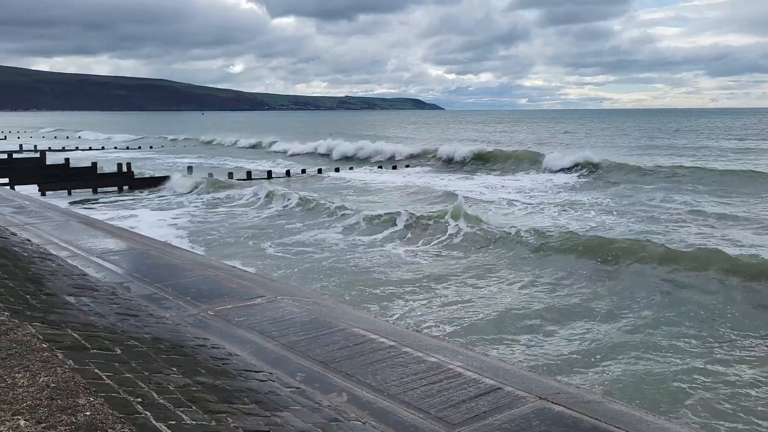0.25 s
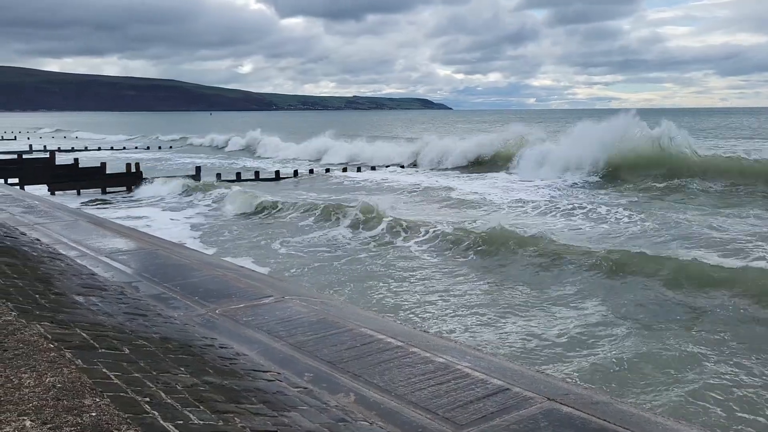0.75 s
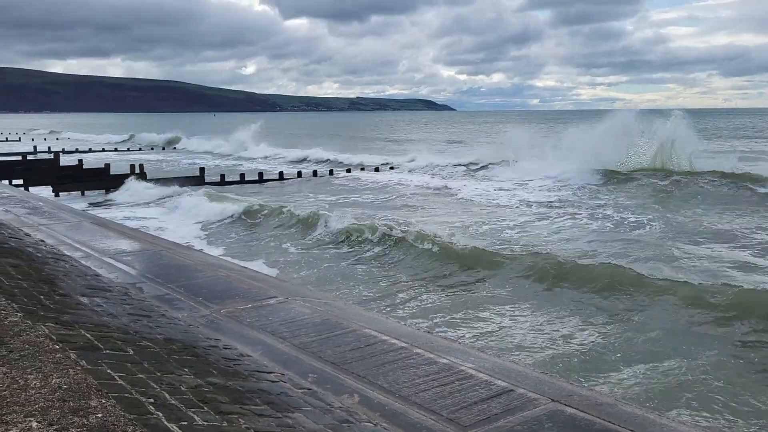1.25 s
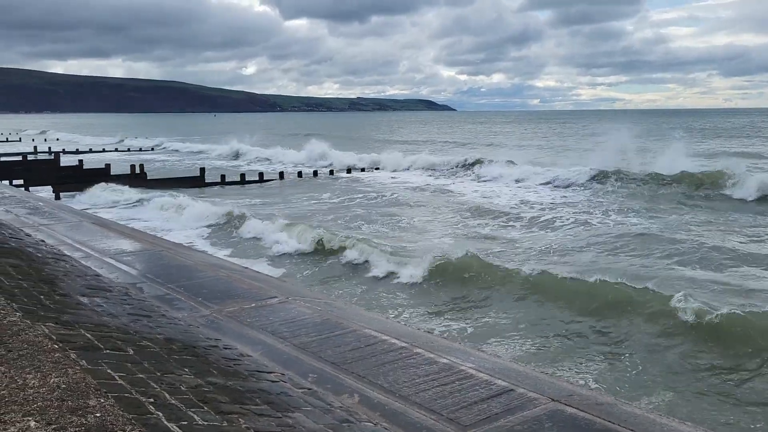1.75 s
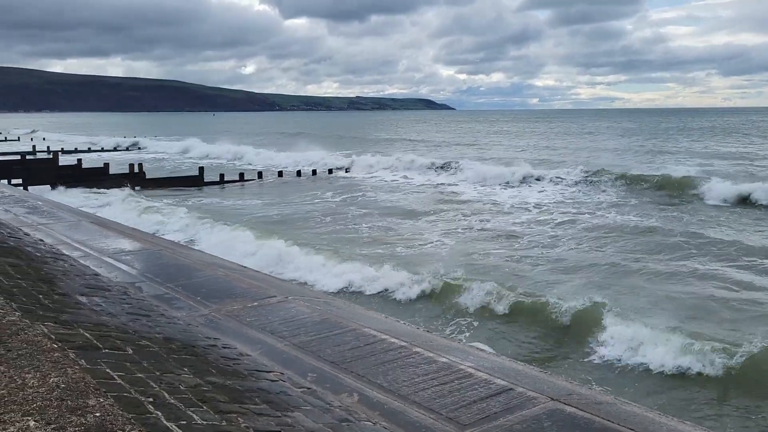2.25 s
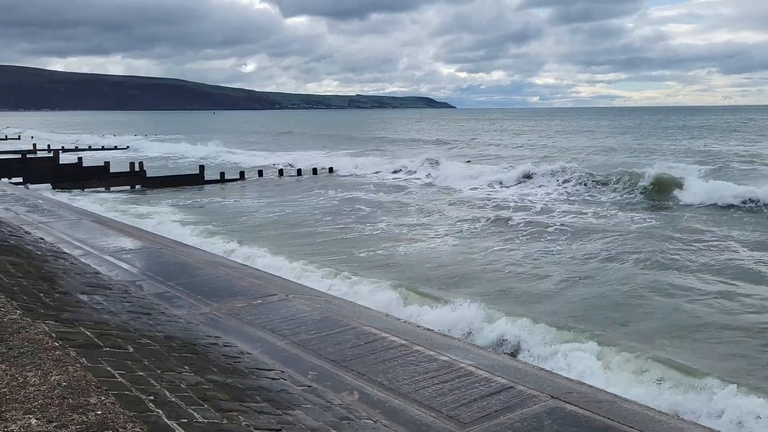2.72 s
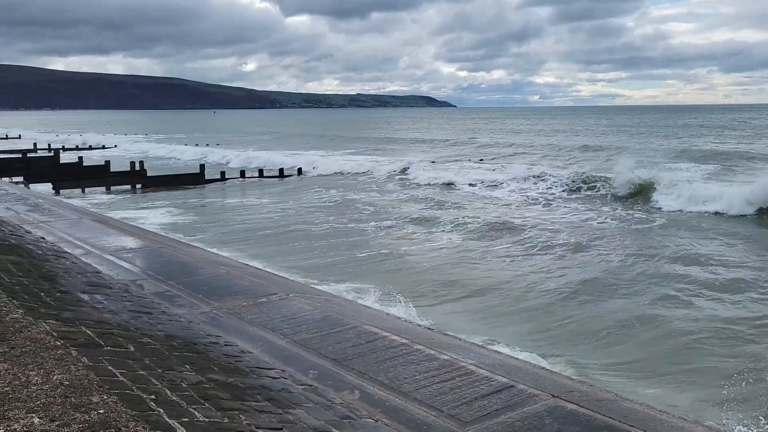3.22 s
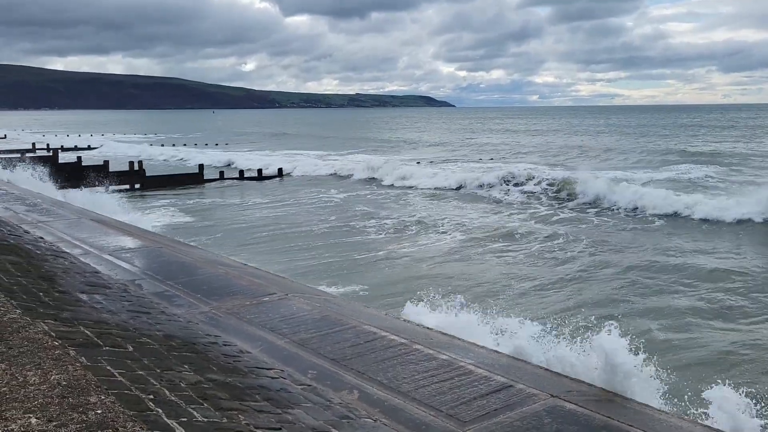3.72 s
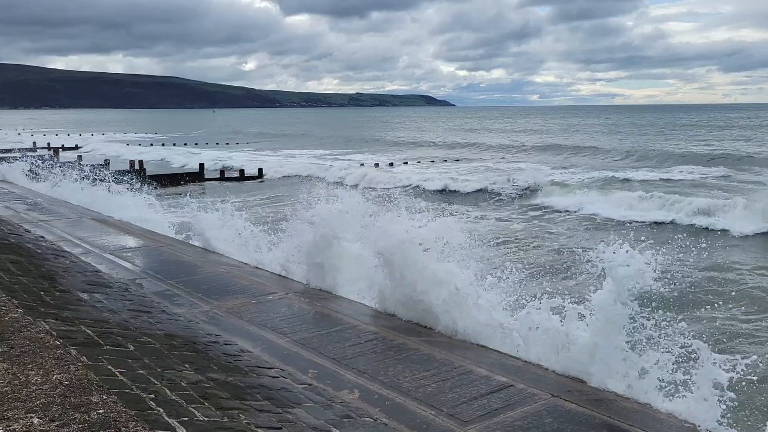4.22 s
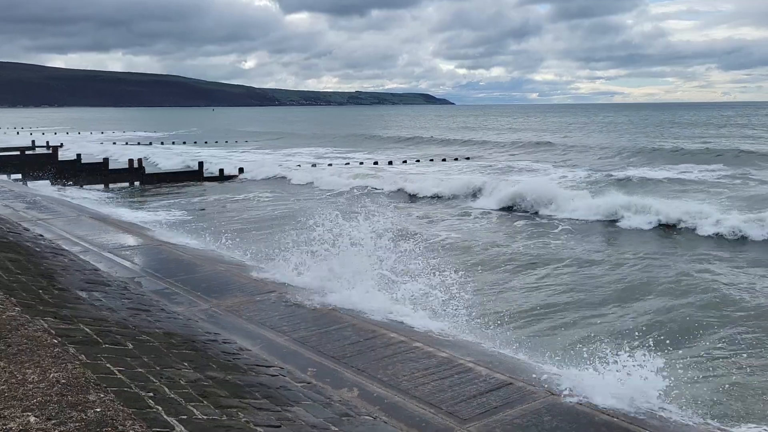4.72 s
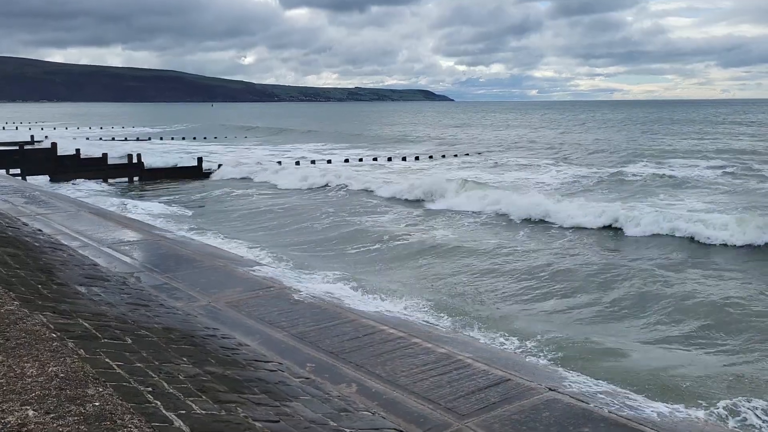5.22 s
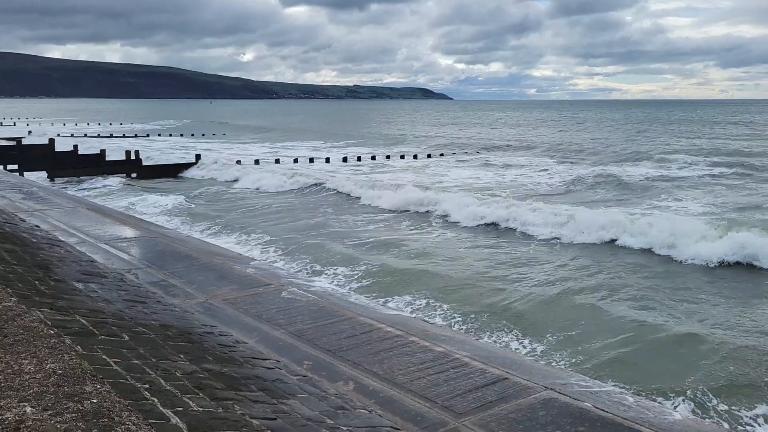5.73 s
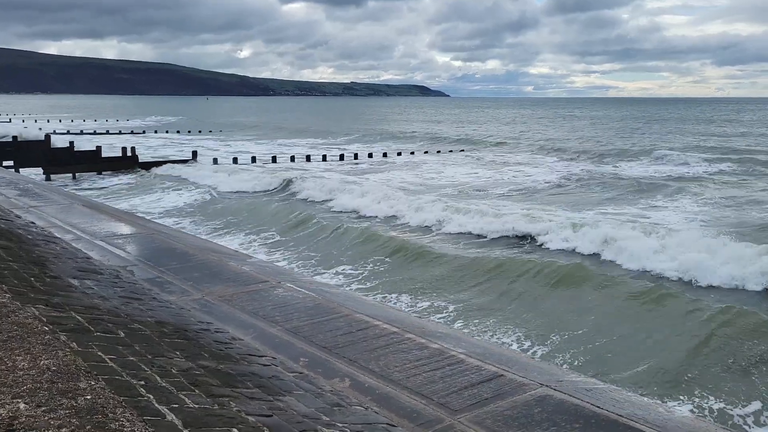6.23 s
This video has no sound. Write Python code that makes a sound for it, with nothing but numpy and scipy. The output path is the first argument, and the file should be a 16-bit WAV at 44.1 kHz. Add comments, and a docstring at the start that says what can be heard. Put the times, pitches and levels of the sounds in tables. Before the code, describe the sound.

Gusty wind thumps and rumbles on the microphone while sea waves break along a concrete sea wall, splash up spray and drain back as foam.

```python
"""Wind knocks at a hand-held recorder on the seafront over a breaker far out; then waves break close by.
They run along a sloping concrete sea wall, throw up spray and drain back as foam: shaped noise and ringing drops.
The left port is covered and faces the wind: it hears the sea dully and takes the hardest buffets.
The open right port hears the bright wash. Wind is low noise swelling with gusts and eddies, plus sharp pulses."""
import sys
import numpy as np
from scipy import signal
from scipy.fft import rfft, irfft, next_fast_len
from scipy.io import wavfile
from scipy.ndimage import uniform_filter1d, minimum_filter1d

SR = 44100
rng = np.random.default_rng(int(sys.argv[2]) if len(sys.argv) > 2 else 0)


def unload_audio(sound):
    """Save the sound as a 16-bit wav file, at the path given as the first command line argument."""
    columns = np.transpose(np.atleast_2d(sound))
    # keep every value between -1 and 1, then stretch to whole-number steps
    steps = np.round(np.clip(columns, -1, 1) * 32767)
    wavfile.write(sys.argv[1], SR, steps.astype(np.int16))


N = 285327
TIME = np.arange(N) / SR
FFT_SIZE = next_fast_len(N + 4096)
FREQS = np.maximum(np.arange(FFT_SIZE // 2 + 1) * SR / FFT_SIZE, 1)

# Spectral shapes of the water, air pockets up to foam: (frequency [Hz], density [dB per Hz])
ROAR_SPECTRUM = [(30, -33), (70, 1.5), (200, -4), (320, 1.5), (460, 0), (670, 2), (820, -2), (1000, -16.5),
                 (1500, -11), (3000, -24)]
WASH_SPECTRUM = [(250, -22), (600, -5), (1000, -.5), (1300, 1.5), (2000, -1), (3000, -2.4), (4500, -3.1),
                 (6500, -4.9), (7800, -2.1), (8700, -7.3), (10000, -22), (13000, -50)]
FIZZ_SPECTRUM = [(4000, -36), (7500, -24), (9200, -0.5), (10500, -2.5), (11600, -11.5), (12700, -0.5),
                 (14000, -2), (15700, -4)]
# Spectral shapes of wind on a port, dull to sharp: (frequency [Hz], density [dB per Hz])
THUD_SPECTRUM = [(15, -37), (32, -15), (55, 1.5), (120, -2.5), (200, -10), (300, -16.5), (450, -30.5),
                 (800, -41), (2000, -67)]
RASP_SPECTRUM = [(120, -7.5), (300, 4), (450, 4.5), (680, -1), (1000, -11.5), (1400, -20), (2200, -40),
                 (4000, -71), (8000, -82)]
CRACKLE_SPECTRUM = [(600, -20), (1300, 0), (2000, -7), (3000, -16), (4500, -31), (7000, -58)]
# Response of the covered left port to the sea: (frequency [Hz], gain [dB])
COVERED_PORT_RESPONSE = [(60, 18), (250, 7.5), (450, 2.5), (650, 3.5), (900, -0.5), (1300, -1),
                         (2000, -4.5), (3000, -8.5), (4500, -17), (6500, -25.5), (8300, -43), (10300, -27),
                         (11600, -16.5), (15500, -24)]
# Likeness of the sea at the two ports: (frequency [Hz], likeness [0-1])
PORT_LIKENESS = [(100, 0.9), (350, .75), (700, 0.6), (1400, .33), (4000, 0), (13000, 0)]
PORT_LAG_S = 0.00036   # the waves arrive from the right
CUTOFF_HZ = 15800

# The open sea behind everything, before layer trims: (roar [dB], wash [dB], fizz [dB])
OPEN_SEA_LEVELS = (-57.5, -52.5, -75)
# Surges of water, before layer trims: a breaker far out, a nearer crest that spills, breaks along
# the wall and runs back; the next meets the wall, its spray shoots up, comes down and lands;
# foam drains, and the backwash meets a new wave, which rolls in:
# (crest time [s], rise to crest from half power [s], fall to half power [s], roar [dB], wash [dB], fizz [dB])
WAVE_SURGES = [(0.24, .2, .4, -50, -49.5, -77), (1.42, .28, .5, -71.5, -56, -63),
               (2.45, .28, .19, -39.5, -32.5, -41), (2.95, .25, .5, -43, -39.5, -51),
               (3.53, .08, 0.2, -39.5, -41.5, -50.5), (3.94, .16, .15, -40.5, -36, -48.5),
               (4.4, .18, .2, -37, -33, -43), (4.82, .08, .14, -53, -39, -48),
               (5.3, .4, .45, -43, -41.5, -52), (5.81, .09, .13, -39, -35, -41.5),
               (6.33, .3, .3, -34.5, -32, -40.5)]
# Brief dips in the level of the sea: (start [s], depth [dB], hold [s], recovery [s])
SEA_DIPS = [(0.5, 8, .3, .35), (4.509, 6.5, .02, .05)]
DIP_ATTACK_S = 0.025

# The breeze between gusts, before port trims: (left [dB], right [dB])
BREEZE_LEVELS = (-41, -51.5)
# Gusts, before port trims: (peak time [s], length at half power [s], left [dB], right [dB])
WIND_GUSTS = [(0.3, 0.21, -37, -37.5), (0.526, 0.24, -21, -42), (0.845, 0.2, -52, -51.5),
              (1.444, 0.12, -26.5, -64), (2.296, 0.43, -24.5, -41.5), (2.573, 0.23, -19.5, -44),
              (3, 0.31, -23.5, -40.5), (3.41, 0.15, -32, -28), (3.913, 1, -28, -45), (4.5, 0.095, -14, -52),
              (5.01, 0.25, -26, -45), (6.3, .9, -26, -41.5)]
# Hard gusts shed eddies on the left port at an even pace, before port trims:
# (first time [s], spacing [s], count, first level [dB], last level [dB],
#  length at half power [s], rasp relative to level [dB])
EDDY_FLURRIES = [(0.416, .058, 3, -5, 0.5, 0.019, -11.5), (0.596, .055, 3, -7.5, -7.5, 0.02, -11),
                 (2.404, .111, 3, -11, -4.5, 0.021, -26.5), (4.412, .041, 4, -7, -3, 0.013, -22.5),
                 (6.142, 0.058, 4, -17.5, -14, 0.02, -49)]
# Lone eddies, before port trims:
# (time [s], port, level [dB], length at half power [s], rasp relative to level [dB])
LONE_BUFFETS = [(0.218, "right", -21.5, 0.006, -5.5), (0.344, "right", -36, 0.019, -3),
                (0.373, "left", -15, 0.028, -35), (0.492, "left", -3, 0.021, -7.5),
                (0.772, "left", -18.5, 0.021, -17), (0.875, "left", -22, 0.018, -38),
                (1.109, "right", -33.5, 0.02, -6), (1.339, "left", -19, 0.022, -19),
                (1.519, "left", -19, 0.0091, -24.5), (2.145, "left", -5, 0.017, -22),
                (2.232, "right", -26.5, 0.036, -9.5), (2.26, "left", -10, 0.011, -36),
                (2.928, "left", -11, 0.014, -46), (2.996, "left", -11.5, .042, -19),
                (3.027, "left", -9, 0.012, -15.5), (3.384, "right", -25.5, .016, 3.5),
                (3.446, "left", -16.5, 0.014, -37), (3.58, "left", -19, .03, -34),
                (4.129, "left", -14, .027, -31), (4.168, "right", -24.5, 0.032, -11.5),
                (4.431, "left", -2, 0.017, -11.5), (4.621, "left", -11, 0.013, -44),
                (4.844, "left", -11, 0.034, -26), (4.855, "right", -39, 0.013, 8.5),
                (5.068, "left", -15.5, 0.013, -27), (5.811, "left", -20.5, .05, -9.5),
                (6.374, "left", -4, 0.015, -16), (6.401, "left", -7, .035, -34),
                (6.463, "left", -8, 0.031, -15.5)]
# Small eddies come at random; their level is relative to the wind that carries them
EDDIES_PER_S, EDDY_DB, EDDY_SPREAD_DB, EDDY_LENGTH_S, EDDY_RASP_DB = 4.3, 7, 3, 0.011, -23.5
# An eddy knocks as it arrives, the harder the raspier it is (dB of knock per dB of rasp)
KNOCK_LEAD_S, KNOCK_FOLLOWS_RASP = 0.00303, 0.71
# Eddies in a flurry heave as they leave; level relative to the eddy
HEAVE_DB, HEAVE_LAG_S, HEAVE_LENGTH_S, HEAVE_HZ = -3.5, 0.0087, 0.03, 56.7


def from_db(db):
    """Decibels to gain."""
    return 10 ** (np.asarray(db) / 20)


def rms_one(x):
    """Scale to unit power."""
    return x / np.sqrt(np.mean(x ** 2) + 1e-20)


def at_hz(points):
    """A table read along a log-frequency axis."""
    hz, value = np.transpose(points)
    return np.interp(np.log(FREQS), np.log(hz), value)


def filtered(x, response):
    """Pass a sound through a frequency response."""
    return irfft(rfft(x, FFT_SIZE) * response, FFT_SIZE)[..., :N]


def noise(spectrum):
    """Coloured noise of unit power."""
    white = rng.standard_normal(N)
    return rms_one(filtered(white, from_db(at_hz(spectrum))))


def drift(rate_hz):
    """Slow chance of spread 1: noise through a two-pole low-pass, drawn every 40 samples."""
    pole = np.exp(-2 * np.pi * rate_hz * 40 / SR)
    white = rng.standard_normal(N // 40 + 2002)
    slow = signal.lfilter([1], [1, -2 * pole, pole ** 2], white)[2000:]   # skip the filter's start
    return np.interp(np.arange(N) / 40, np.arange(len(slow)), rms_one(slow))


def swell(s, rise_s, fall_s):
    """Power that builds to 1 at a moment and dies away; it is halved one rise before and one fall after."""
    width = np.maximum(np.where(TIME < s, rise_s, fall_s), 0.002)
    return 1 / 2 ** np.minimum(((TIME - s) / width) ** 2, 60)


def surf_levels():
    """Roar, wash and fizz in dB: the surges add power to the open sea, less the dips."""
    power = from_db(OPEN_SEA_LEVELS)[:, None] ** 2
    for s, rise_s, fall_s, *levels_db in WAVE_SURGES:
        power = power + from_db(levels_db)[:, None] ** 2 * swell(s, rise_s, fall_s)
    dip_db = 0
    for s, depth_db, hold_s, recovery_s in SEA_DIPS:
        corners = s + np.cumsum([0, DIP_ATTACK_S, hold_s, recovery_s])
        dip_db = dip_db + np.interp(TIME, corners, [0, depth_db, depth_db, 0])
    return 10 * np.log10(power) - dip_db


def churn(spectrum, surge_db, patch_db, rate_hz, count=5):
    """Churning water: the whole surges together, and each pitch region swells on its own."""
    gain = from_db(at_hz(spectrum))
    white = rfft(rng.standard_normal((2, FFT_SIZE)))
    # overlapping regions lie evenly in log frequency between the inner points of the spectrum
    ends_hz = [spectrum[1][0], spectrum[-2][0]]
    region = np.interp(np.log(FREQS), np.log(ends_hz), [0, count - 1])
    water = 0
    for k in range(count):
        share = np.maximum(0, 1 - abs(region - k))
        band = irfft(white * gain * share, FFT_SIZE)[:, :N]
        water = water + band * from_db(patch_db * drift(rate_hz))
    return rms_one(water * from_db(surge_db * drift(rate_hz / 2)))


def drops(per_s, low_hz, high_hz, cycles, spread_db, count=18):
    """Drops and bubbles of all sizes, each a click in a resonance that rings down 60 dB in so many cycles."""
    born = np.flatnonzero(rng.random(N) < per_s / SR)
    boost_db = spread_db * np.minimum(rng.exponential(1, len(born)), 4)
    sizes = from_db(boost_db) * rng.standard_normal((2, len(born)))
    pitch = rng.integers(0, count, len(born))
    ringing = np.zeros((2, N))
    for k, hz in enumerate(np.geomspace(low_hz, high_hz, count)):
        clicks = np.full((2, N), 1e-18)   # a trace of signal keeps the filter out of tiny numbers
        clicks[:, born[pitch == k]] = sizes[:, pitch == k]
        r = np.exp(-np.log(1000) * hz / (cycles * SR))
        w = 2 * np.pi * hz / SR
        ringing += signal.lfilter([w, 0, -w], [1, -2 * r * np.cos(w), r * r], clicks)
    return rms_one(ringing)


def at_ports(pair):
    """Two unrelated sounds become left and right: partly alike, the left one late and muffled."""
    alike = np.clip(at_hz(PORT_LIKENESS), 0, 0.98)
    lag = np.exp(-2j * np.pi * FREQS * PORT_LAG_S)
    shared = filtered(pair[1], alike * lag)
    left = shared + filtered(pair[0], np.sqrt(1 - alike ** 2))
    covered = filtered(left, from_db(at_hz(COVERED_PORT_RESPONSE)))
    return np.array([covered, pair[1]])


def sea():
    """Big air pockets roar, white water washes and bubbles, foam fizzes, spray patters on the concrete."""
    roar_db, wash_db, fizz_db = surf_levels()
    roar = from_db(roar_db + 3.5) * churn(ROAR_SPECTRUM, surge_db=1.0, patch_db=-0.8, rate_hz=6.7)
    wash = from_db(wash_db + 0.62) * churn(WASH_SPECTRUM, surge_db=0.1, patch_db=1.25, rate_hz=25, count=8)
    fizz = from_db(fizz_db + 0.9) * churn(FIZZ_SPECTRUM, surge_db=0, patch_db=1.3, rate_hz=25)
    # more white water throws more drops and traps more bubbles
    froth = from_db((wash_db + 35.5) / 2)
    spray = drops(2800 * froth, low_hz=1230, high_hz=5640, cycles=16, spread_db=1.5)
    spray = from_db(wash_db - 9.5) * froth * spray
    bubbles = drops(500 * froth, low_hz=425, high_hz=2180, cycles=13, spread_db=3, count=36)
    bubbles = from_db(wash_db - 17.5) * bubbles
    return at_ports(roar + wash + fizz + spray + bubbles)


def wind_levels():
    """Wind pressure on the left and right port in dB: gusts add power to the breeze."""
    power = from_db(BREEZE_LEVELS)[:, None] ** 2
    for s, length_s, *levels_db in WIND_GUSTS:
        power = power + from_db(levels_db)[:, None] ** 2 * swell(s, length_s / 2, length_s / 2)
    return 10 * np.log10(power)


def small_eddies(steady_db):
    """Chance eddies, on average in step with the wind of the moment."""
    born = np.flatnonzero(rng.random(N) < EDDIES_PER_S / SR)
    level_db = steady_db + EDDY_DB + EDDY_SPREAD_DB * rng.standard_normal(N)
    return [(i / SR, level_db[i], EDDY_LENGTH_S, EDDY_RASP_DB) for i in born]


def lone_eddies(port):
    """The lone eddies of one port as (time [s], level [dB], length [s], rasp [dB])."""
    return [(s, *rest) for s, where, *rest in LONE_BUFFETS if where == port]


def flurry_eddies():
    """Each flurry is a row of evenly spaced eddies whose level runs from first to last."""
    eddies = []
    for first_s, spacing_s, count, first_db, last_db, length_s, rasp_db in EDDY_FLURRIES:
        for k, level_db in enumerate(np.linspace(first_db, last_db, round(count))):
            eddies.append((first_s + k * spacing_s, level_db, length_s, rasp_db))
    return eddies


def evened(x, span_s):
    """Noise with its chance swells ironed out."""
    size = max(int(span_s * SR), 2)
    power = uniform_filter1d(uniform_filter1d(x ** 2, size), size)
    return rms_one(x / np.sqrt(np.maximum(power, 1e-6)))


def jolts(clicks, spectrum):
    """Each unit click becomes a short pressure pulse of height 1."""
    response = from_db(at_hz(spectrum))
    height = irfft(response, FFT_SIZE)[0]
    return filtered(clicks, response / height)


def wind(steady_db, buffets, rasp_db, steady_rasp_db, lumpy_db, crackle_db, spurts_per_s):
    """Pressure on one port: a lumpy rumble, and eddies that thud and rasp as they pass."""
    power = from_db(steady_db + lumpy_db * drift(21.7)) ** 2
    rough = power * from_db(steady_rasp_db) ** 2
    for s, level_db, length_s, edge_db in buffets + small_eddies(steady_db):
        # an eddy arrives faster than it leaves
        bump = swell(s, 0.4 * length_s, 0.6 * length_s)
        power = power + from_db(level_db) ** 2 * bump
        rough = rough + from_db(level_db + edge_db) ** 2 * bump
    thud = np.sqrt(power) * evened(noise(THUD_SPECTRUM), span_s=0.011)
    # small vortices leave the port's edge in separate spurts
    spurts = (rng.random(N) < spurts_per_s / SR) * rng.standard_normal(N)
    rasp = np.sqrt(rough) * evened(rms_one(jolts(spurts, RASP_SPECTRUM)), span_s=0.017)
    # crackle follows power, not pressure, so it favours the most violent eddies
    crackle = rough * rms_one(jolts(spurts, CRACKLE_SPECTRUM))
    return thud + from_db(rasp_db) * rasp + from_db(crackle_db) * crackle


def knocks(eddies, knock_db, crackle_db, rebound):
    """A sudden break of the flow: one sharp pulse and a weaker swing back a few milliseconds later."""
    body, edge = np.zeros((2, N))
    chances = rng.random((len(eddies), 2))
    for (middle_s, level_db, _, edge_db), (side, delay) in zip(eddies, chances):
        s = middle_s - KNOCK_LEAD_S
        back_s = s + 0.00132 + 0.00331 * delay
        at = np.minimum([round(s * SR), round(back_s * SR)], N - 1)
        swing = np.sign(side - 0.5) * np.array([1, -rebound])   # push or pull first, by chance
        peak_db = level_db + KNOCK_FOLLOWS_RASP * edge_db
        body[at] += swing * from_db(peak_db + knock_db)
        edge[at] += swing * from_db(peak_db + edge_db + crackle_db)
    return jolts(body, RASP_SPECTRUM) + jolts(edge, CRACKLE_SPECTRUM)


def heaves(eddies):
    """The wake of an eddy pushes and pulls on the port for two or three slow swings."""
    pressure = np.zeros(N)
    for (s, level_db, _, _), phase in zip(eddies, rng.random(len(eddies))):
        bump = swell(s + HEAVE_LAG_S, HEAVE_LENGTH_S / 2, HEAVE_LENGTH_S / 2)
        swings = np.sin(2 * np.pi * (HEAVE_HZ * (TIME - s) + phase))
        pressure += from_db(level_db + HEAVE_DB) * bump * swings
    return pressure


def overloaded(x, top, corner_hz, hold_s):
    """A fast limiter rounds off big pressure swings; the port passes little of their treble."""
    dull = signal.sosfilt(signal.butter(4, corner_hz, fs=SR, output="sos"), x)
    size = max(int(hold_s * SR), 2)
    gain = minimum_filter1d(1 / np.maximum(abs(dull) / top, 1), 2 * size + 1)
    return dull * uniform_filter1d(uniform_filter1d(gain, size), size)


def scene():
    """The sea beyond the recorder, with wind close on both ports."""
    left_db, right_db = wind_levels()
    flurries = flurry_eddies()
    on_left, on_right = flurries + lone_eddies("left"), lone_eddies("right")
    left = wind(left_db, on_left, rasp_db=-1, steady_rasp_db=-23, lumpy_db=3.5,
                crackle_db=-12.5, spurts_per_s=380)
    right = wind(right_db, on_right, rasp_db=3.0, steady_rasp_db=-5.0, lumpy_db=1.0,
                 crackle_db=-16, spurts_per_s=420)
    left = from_db(-1.0) * left + knocks(on_left, knock_db=8.5, crackle_db=-9, rebound=0.99)
    right = from_db(-1.9) * right + knocks(on_right, knock_db=-1, crackle_db=-22, rebound=0.9)
    pressure = np.array([left + heaves(flurries), right])
    return sea() + overloaded(pressure, top=0.92, corner_hz=3600, hold_s=0.0004)


def record(dry):
    """The top is cut steeply, over 120 Hz around the cutoff."""
    return filtered(dry, np.clip((CUTOFF_HZ - FREQS) / 120 + 0.5, 0, 1))


dry = scene()
out = record(dry)
unload_audio(out)
```